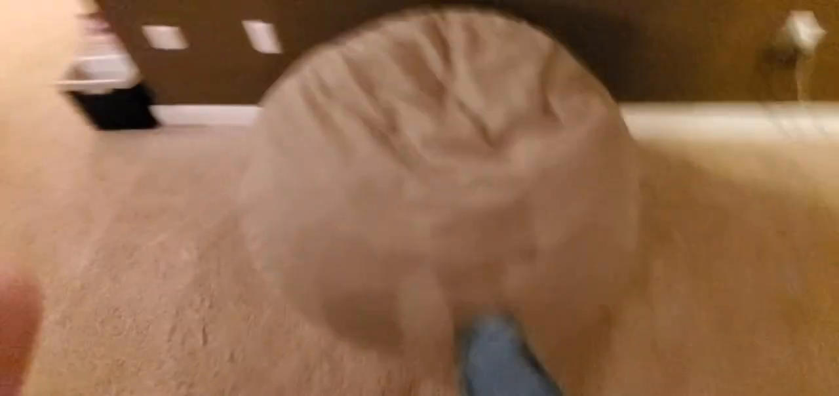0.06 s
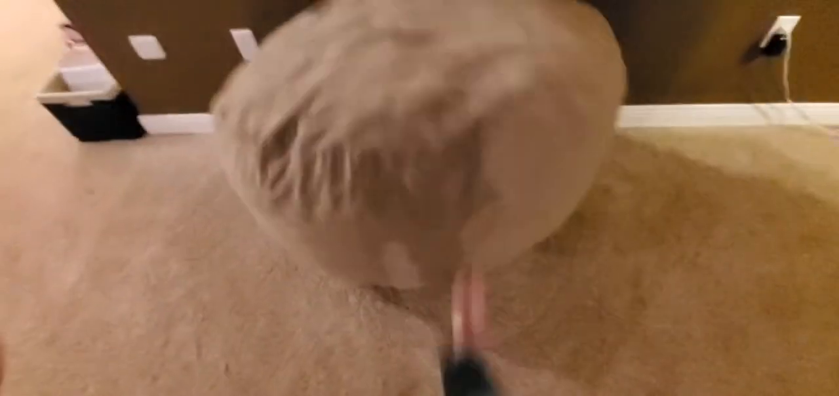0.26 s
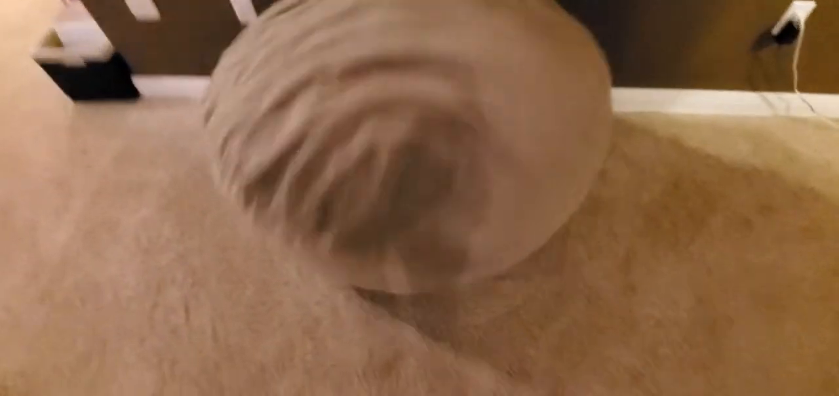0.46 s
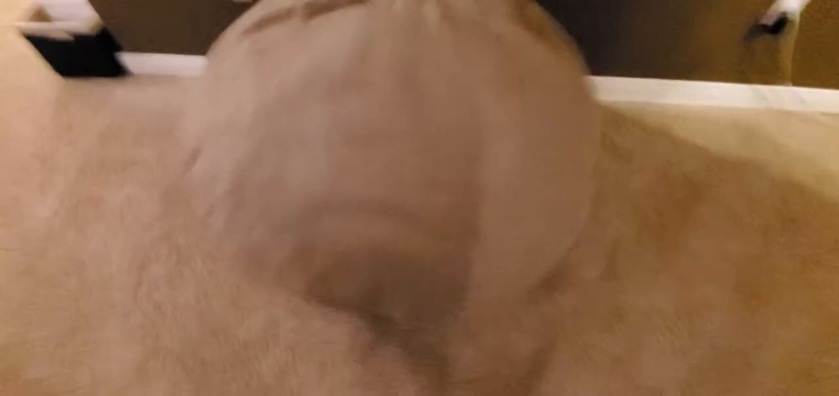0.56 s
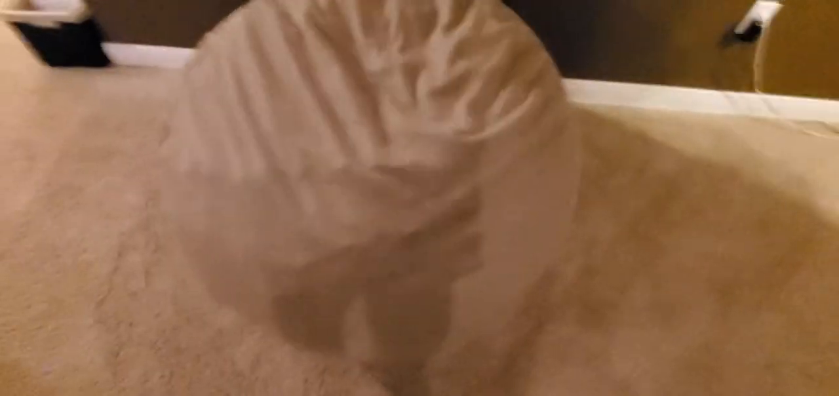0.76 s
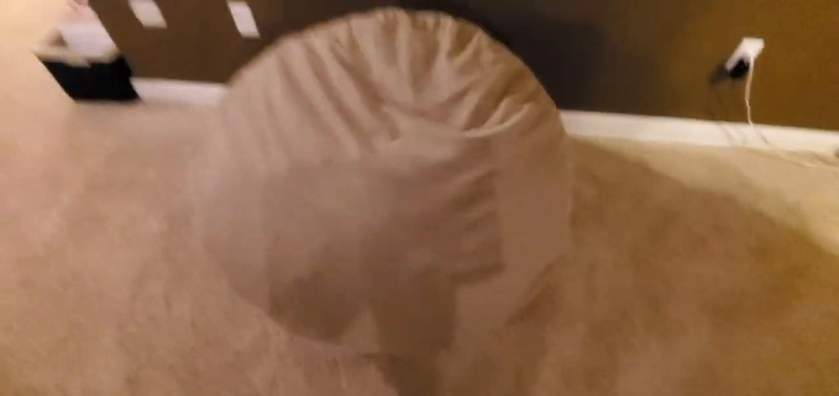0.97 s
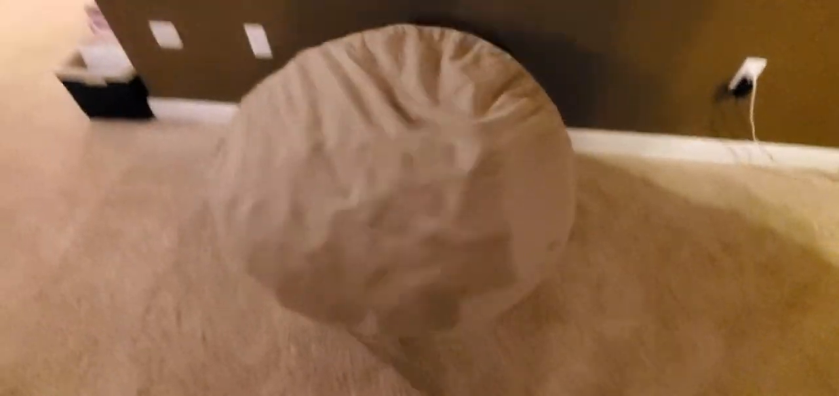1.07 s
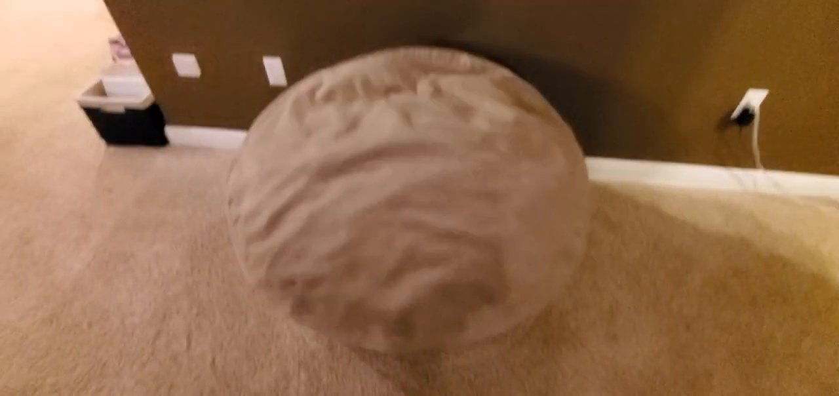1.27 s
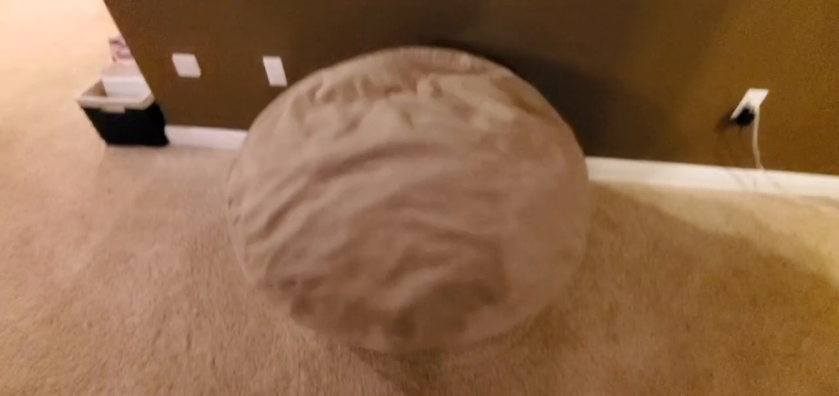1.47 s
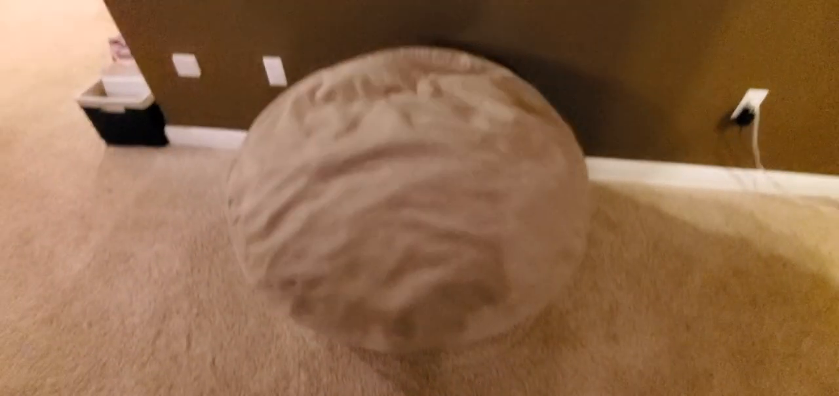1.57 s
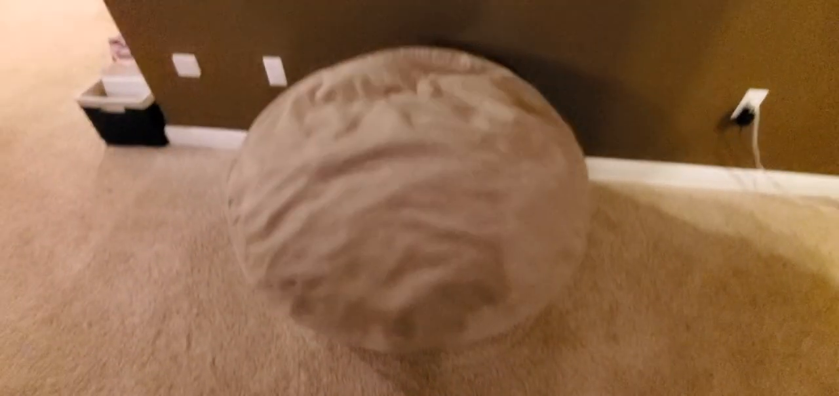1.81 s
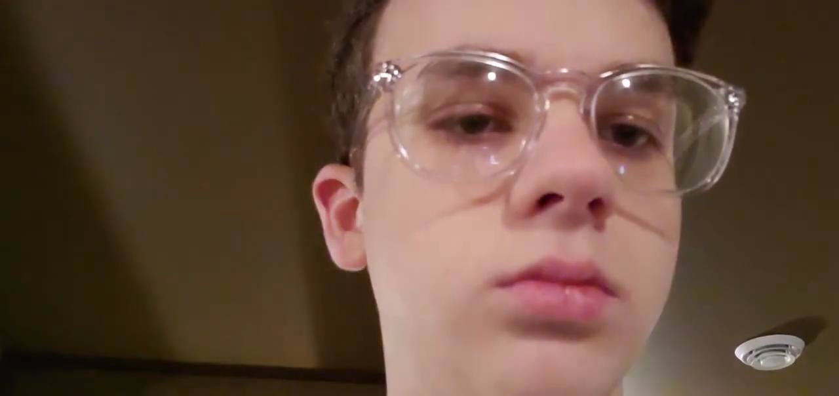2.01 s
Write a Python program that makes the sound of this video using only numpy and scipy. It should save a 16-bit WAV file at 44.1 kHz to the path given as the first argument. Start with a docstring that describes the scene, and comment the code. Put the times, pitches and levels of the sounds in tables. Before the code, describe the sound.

A hand slaps a big cloth beanbag at about 0.2 seconds, slightly left: a smack, a deep thump and hissing filling in a small, quiet carpeted room. The bag rocks back with soft thuds and cloth rustle around 0.7 to 1 second, then settles. Fingers tick faintly on the microphone at the right, at the start and after 1.2 seconds, ending in a low bump cut off near 1.8 seconds.

```python
"""A small, quiet, carpeted room, heard from the stereo microphones of a hand-held camera.
Slightly to the left a hand slaps a big cloth beanbag: a smack, a deep thump, the hiss of shifting filling.
The bag tips away, rocks back with soft thuds and a rustle of cloth, and settles.
Right at the microphones, fingers tick on the camera and bump it; this handling noise stops dead
as the camera switches view."""
import sys
import numpy as np
from scipy import signal
from scipy.fft import rfft, irfft
from scipy.io import wavfile

SR = 44100
rng = np.random.default_rng(int(sys.argv[2]) if len(sys.argv) > 2 else 0)


def pcm_store(signal):
    """Save signal as 16-bit PCM."""
    levels = np.round(np.clip(np.atleast_2d(signal), -1, 1) * 32767)
    wavfile.write(sys.argv[1], SR, levels.astype(np.int16).T)


N = 90404
TIME, FREQS = np.arange(N) / SR, np.fft.rfftfreq(N, 1 / SR)


def strike():
    """The palm smacks the cover, the filling is crushed, and the arm's weight sets bag and room ringing."""
    # Hand meeting cloth. Each row: start in seconds, level in dB, twice the rise time in seconds.
    smacks = [(0.2058, -23, 0.0022), (0.2144, -30.5, 0.0026)]
    # Tone of the smack and of the crushed filling. Each row: frequency in Hz, relative level in dB.
    smack_colour = [(200, -3.5), (600, 1.5), (1200, -4), (2200, -1), (4200, -7), (6800, -16.5),
                    (8000, -34.5), (16000, -39.5)]
    crush_colour = [(25, -18), (45, -7), (95, -3), (125, -10), (150, -10), (185, -3), (250, -2), (330, -2),
                    (500, -6), (750, -11), (1100, -17.5), (2000, -17.5), (2650, -21), (3400, -18),
                    (4000, -23), (4600, -22.5), (5200, -31.5), (6800, -35), (7500, -50.5), (16000, -58.5)]
    # The crush dying in the room. Each row: frequency in Hz, seconds to fall 60 dB.
    crush_t60 = [(50, 0.55), (130, 0.45), (260, 0.6), (700, 0.44), (2000, 0.46), (5000, 0.55),
                 (12000, 0.72)]
    # Low resonances of bag and room. Each row: frequency in Hz, level in dB, seconds to fall 60 dB.
    boom_modes = [(48, -12.5, 0.3), (87, -17, 0.28), (121.7, -29.5, 0.17), (194, -23.5, 0.38),
                  (237.6, -32, 0.55), (283.8, -29.5, 0.54), (337.3, -28, 0.45), (400, -37.5, 0.75),
                  (502, -29, 0.25), (658, -36, 0.35), (790, -37.5, 0.35), (838, -42, 0.4)]
    crush_s, crush_rise_s, crush_db = 0.2065, 0.0059, -21.5
    boom_s, boom_rise_s = 0.2110, 0.002
    contact = sum(amp(db) * swell(since(start) / (length / 2)) for start, db, length in smacks)
    smack = coloured(read(smack_colour, FREQS)) * contact * pan(db=4.5)
    filling = coloured(read(crush_colour, FREQS), grains(per_s=9000, spread_db=3.0))
    crush = dying(filling, crush_s, crush_t60) * (1 - np.exp(-since(crush_s) / crush_rise_s))
    boom = -ring(boom_modes, boom_s) * (1 - np.exp(-since(boom_s) / boom_rise_s))
    return smack + amp(crush_db) * crush + boom


def thuds():
    """Each blow dents the bag and sways it briefly, and a footstep lands on the floor; the room answers."""
    # Dull blows: the strike, the bag rocking back, and a footstep on the floor near 0.95 s. # Each row: start
    # in seconds, level in dB, pitch in Hz, 1.3 times the rise in cycles.
    blows = [(0.2058, -9, 170, 0.48), (0.2066, -20, 505, 4.0), (0.2139, -14.5, 111, 0.47),
             (0.2337, -12, 86, 0.27), (0.2565, -20, 148, 0.49), (0.2830, -25.5, 80, 0.74),
             (0.3060, -28.5, 200, 0.46), (0.3200, -28, 189, 0.4), (0.346, -36.5, 40, 1.35),
             (0.434, -32, 270, 0.7), (0.488, -47, 41.5, 0.98), (0.6060, -48, 130, 0.4),
             (0.693, -46, 134.3, 0.68), (0.7470, -38.5, 169, 0.6), (0.7490, -41.5, 424, 1.24),
             (0.8030, -32.5, 71.4, 0.5), (0.839, -36, 98.6, 0.6), (0.8420, -37.5, 195, 0.84),
             (0.8730, -40, 75.3, 0.69), (0.948, -34.5, 72.5, 0.81), (1.014, -47, 53, 0.71)]
    # The room's reverberation. Each row: frequency in Hz, seconds to fall 60 dB.
    room_t60 = [(50, 0.42), (130, 0.33), (250, 0.45), (1000, 0.45)]
    room_db, room_rise_s = -16.5, 0.02
    direct = np.zeros(N)
    for start, db, hz, cycles in blows:
        turns = since(start) * hz
        direct -= amp(db) * swell(turns / cycles * 1.3) * np.sin(2 * np.pi * turns)
    tail = dying(coloured(colour_db=0), 0, room_t60) * np.minimum(TIME / room_rise_s, 1)
    room = signal.fftconvolve(direct[None], tail / np.linalg.norm(tail[0]), axes=1)[:, :N]
    return direct + amp(room_db) * room


def rustle():
    """The cloth slips over the filling in uneven spurts, and folds brush past each other."""
    # The sliding cover. Each row: time in seconds, level in dB.
    slide_level = [(0, -65.5), (0.14, -61.5), (0.2, -58), (0.215, -42), (0.295, -44.5), (0.38, -50),
                   (0.44, -47.5), (0.5, -54), (0.56, -58.5), (0.63, -62.5), (0.71, -59.5), (0.76, -56),
                   (0.86, -52), (0.93, -59), (1.0, -67.5), (1.1, -75.5), (1.3, -69.5), (1.77, -82)]
    # Tone of the cloth. Each row: frequency in Hz, relative level in dB.
    cloth_colour = [(100, 6), (500, 8.5), (1000, 1), (1600, 2.5), (2250, 3.5), (3000, -1.5), (4400, -3),
                    (5500, -6), (6900, -3.5), (7600, -17), (11000, -11.5), (15500, -12)]
    # Where each band sits between the microphones. Each row: frequency in Hz, left minus right in dB.
    cloth_pan = [(500, -1.5), (1300, 2.5), (2400, -5.5), (4400, 4.5), (8000, 25.5), (15000, 19.5)]
    # Brushing folds. Each row: start in seconds, level in dB, rise in seconds, centre in Hz,
    # half-width in octaves, left minus right in dB.
    brushes = [(0.650, -51, 0.0039, 1600, 1.6, 2), (0.652, -55, 0.014, 2900, 0.35, -3),
               (0.72, -57, 0.019, 2170, 0.28, -6), (0.877, -56, 0.014, 2140, 0.22, -10),
               (0.168, -50, 0.0012, 3000, 1.6, -3), (0.421, -54, 0.0077, 5600, 0.7, 14),
               (0.554, -60.5, 0.0044, 12500, 0.7, 19), (0.75, -66, 0.04, 13500, 0.6, 20),
               (0.84, -61, 0.014, 13500, 0.6, 17), (1.542, -77.5, 0.013, 13000, 0.6, 8),
               (1.012, -75, 0.1, 2150, 0.35, -10.5), (1.4015, -57, 0.001, 4200, 0.8, -14)]
    spurt_db, spurt_s = 1, 0.0081
    slips = coloured(read(cloth_colour, FREQS), grains(per_s=6000, spread_db=0.5))
    cloth = filtered(slips, pan(read(cloth_pan, FREQS)))
    spurts = unit(filtered(rng.standard_normal(N), np.exp(-(FREQS * spurt_s) ** 2)))
    out = cloth * level(slide_level) * amp(spurt_db * spurts)
    for start, db, rise, hz, octaves, pan_db in brushes:
        band_db = -40 * np.log10(1 + (np.log2((FREQS + 1) / hz) / octaves) ** 2)
        out += amp(db) * swell(since(start) / rise) * coloured(band_db) * pan(pan_db)
    return out


def roll():
    """The filling rumbles as the bag rolls."""
    # Course of the rumble. Each row: time in seconds, level in dB.
    roll_level = [(0, -56), (0.12, -60.5), (0.2, -56), (0.40, -59), (0.44, -42.5), (0.47, -55.5),
                  (0.6, -73), (0.675, -60), (0.695, -42.5), (0.725, -51.5), (0.755, -45), (0.78, -47.5),
                  (0.85, -45.5), (0.9, -52), (0.95, -60), (1.05, -72), (1.3, -68.5), (1.7, -85)]
    # Its tone. Each row: frequency in Hz, relative level in dB.
    roll_colour = [(25, -15), (45, -1.5), (95, -1), (135, -9.5), (190, 3.5), (350, -3), (530, -10),
                   (700, -19.5), (1200, -30.5), (4000, -67)]
    return coloured(read(roll_colour, FREQS), grains(per_s=900, spread_db=1.0)) * level(roll_level)


def handling():
    """Fingers rub, tick on and bump the camera, mostly on the right, until the switch cuts them off."""
    # Skin rubbing on the case. Each row: time in seconds, level in dB.
    grip_level = [(0, -55), (0.06, -51), (0.12, -58.5), (0.6, -68), (1.1, -70), (1.2, -64), (1.32, -61.5),
                  (1.48, -60.5), (1.62, -64.5), (1.68, -63.5), (1.76, -51.5)]
    # Tone of the rubbing. Each row: frequency in Hz, relative level in dB.
    grip_colour = [(30, 2), (65, 16), (130, -3.5), (400, -6), (800, -23), (1600, -24.5), (2800, -13.5),
                   (4500, -28), (6700, -25), (7800, -53), (16000, -29)]
    # The plastic case, rung by the sharpest press.
    # Each row: frequency in Hz, level in dB, seconds to fall 60 dB.
    case_modes = [(1080, -37, 0.021), (2180, -39.5, 0.019), (2830, -41, 0.02), (3220, -39, 0.019),
                  (3780, -52, 0.019), (5450, -52.5, 0.016)]
    # Fingers on and near the camera.
    # Each row: start in seconds, level in dB, low-pass corner in Hz, left minus right in dB.
    ticks = [(0.0065, -39, 248, -19), (0.0208, -37, 3000, -19), (0.0249, -24, 2950, -47),
             (0.0422, -36.5, 1400, -21), (0.0504, -25, 870, -36), (0.1024, -42, 800, -1),
             (0.169, -48, 6000, -15), (0.466, -29.5, 1200, -17), (0.598, -36, 800, -32),
             (1.2208, -38, 502, -25.5), (1.308, -47.5, 692, -30), (1.4032, -45, 11800, -28),
             (1.4343, -35, 600, -34), (1.468, -52, 2520, -20), (1.477, -50, 510, -17),
             (1.697, -46, 1513, -23), (1.7242, -39.5, 804, -29), (1.734, -27, 2160, -38.5),
             (1.7369, -38.5, 2000, -34), (1.745, -29, 200, -36), (1.758, -35.5, 2000, -29)]
    bump_s, bump_hz, bump_db, bump_grow_s = 1.7605, 57.1, -16, 0.016
    switch_s = 1.7675
    out = level(grip_level) * coloured(read(grip_colour, FREQS)) * pan(db=-18.5)
    out += ring(case_modes, start=1.7342) * pan(db=-34)
    for start, db, corner_hz, pan_db in ticks:
        click, at = finger_tick(corner_hz), round(start * SR)
        out[:, at:at + len(click)] += amp(db) * pan(pan_db) * click
    t = TIME - bump_s
    growth = np.exp(np.minimum(t, 0) / bump_grow_s)  # swells until bump_s, then holds
    bump = -amp(bump_db) * growth * np.sin(2 * np.pi * bump_hz * t)
    return (out + bump * pan(db=-53)) * (TIME < switch_s)


def finger_tick(corner_hz, rattle_db=-34.5, rattle_s=0.0037, size=2048):
    """A fingertip on the case: one dull click with a brief rattle."""
    # Tone of the case. Each row: frequency in Hz, relative level in dB.
    case_colour = [(30, -24), (130, -3.5), (380, 7.5), (900, 0.5), (2000, 2), (3500, -1.5), (5000, -13.5),
                   (6800, -25.5), (8000, -32), (16000, -21.5)]
    hz, t = abs(np.fft.fftfreq(size, 1 / SR)), np.arange(size) / SR
    log_gain = np.log(amp(read(case_colour, hz)) / np.hypot(1, hz / corner_hz))
    click = np.fft.ifft(np.exp(np.conj(signal.hilbert(log_gain)))).real  # minimum phase: a sudden onset
    rattle = amp(rattle_db) * rng.standard_normal(size) * np.exp(-t / rattle_s)
    return (click + signal.fftconvolve(click, rattle)[:size]) / abs(click).max()


def room_air(db):
    """The still air of the room: a steady low rush."""
    # Room tone. Each row: frequency in Hz, relative level in dB.
    air_colour = [(25, -4.5), (45, 4.5), (70, 4.5), (130, -11), (250, -10.5), (480, -14), (700, -29),
                  (1400, -27), (3200, -29), (5000, -38.5), (8000, -41.5), (10500, -30), (15500, -36)]
    return amp(db) * coloured(read(air_colour, FREQS))


def amp(db):
    """Decibels to gain."""
    return 10 ** (np.asarray(db) / 20)


def unit(x):
    """Scales to rms 1."""
    return x / np.sqrt(np.mean(x ** 2) + 1e-20)


def read(points, hz):
    """Reads a table on a log-frequency axis."""
    f, value = np.transpose(points)
    return np.interp(np.log(hz + 1), np.log(f + 1), value)


def level(points):
    """Gain over time from a level curve."""
    return amp(np.interp(TIME, *np.transpose(points)))


def since(start):
    """Seconds since start, zero before it."""
    return np.maximum(TIME - start, 0)


def pan(db):
    """Left and right gains of constant total power, from left minus right in dB."""
    gains = amp(np.array([np.atleast_1d(db), -np.atleast_1d(db)]) / 2)
    return gains / np.sqrt(np.mean(gains ** 2, 0))


def swell(u):
    """Rises to 1 at u = 1, then dies away."""
    return u * np.exp(1 - u)


def filtered(x, gain):
    """Applies a gain to each frequency."""
    return irfft(rfft(x) * gain, N)


def ring(modes, start):
    """Resonances struck together, each a dying sine."""
    t = since(start)
    return sum(amp(db - 60 * t / t60) * np.sin(2 * np.pi * hz * t) for hz, db, t60 in modes)


def coloured(colour_db, source=None):
    """Stereo noise (or a given pair of sources) shaped to a spectrum, alike in the bass, at rms 1."""
    # How alike the two microphones hear it. Each row: frequency in Hz, correlation.
    likeness = [(60, 0.74), (290, 0.94), (640, 0.59), (1400, 0.25), (3000, 0.05), (15000, 0.1)]
    a, b = rfft(rng.standard_normal((2, N)) if source is None else source)
    like = np.clip(read(likeness, FREQS), -1, 1)
    mid, side = a * np.sqrt(1 + like), b * np.sqrt(1 - like)
    return unit(irfft(np.array([mid + side, mid - side]) * amp(colour_db), N))


def dying(x, start, t60s):
    """Lets each band die at its own speed from start on."""
    hz, t, bands = signal.stft(x, SR, nperseg=1024)
    decay = amp(-60 * np.maximum(t - start, 0) / read(t60s, hz)[:, None])
    return signal.istft(bands * decay, SR, nperseg=1024)[1][:, :N]


def grains(per_s, spread_db):
    """Two trains of tiny random slips of uneven size."""
    slips = rng.standard_normal((2, N)) * (rng.random((2, N)) < per_s / SR)
    return slips * amp(spread_db * np.minimum(rng.exponential(1, (2, N)), 4))


def scene():
    """The bag, a little nearer the left microphone, then camera handling and the air of the room."""
    left_lead_s = 0.00007
    left, right = strike() + thuds() + rustle() + roll()
    right = filtered(right, np.exp(-2j * np.pi * FREQS * left_lead_s))
    return np.array([left, right]) + handling() + room_air(db=-71)


def record(dry):
    """The recorder cuts off the highest treble."""
    edge_hz = 15850
    low_pass = signal.firwin(511, edge_hz, window=("kaiser", 9), fs=SR)
    return signal.oaconvolve(dry, low_pass[None], "same")


dry = scene()
out = record(dry)
pcm_store(out)
```